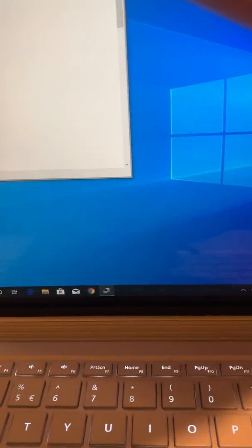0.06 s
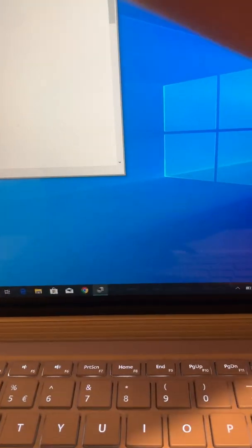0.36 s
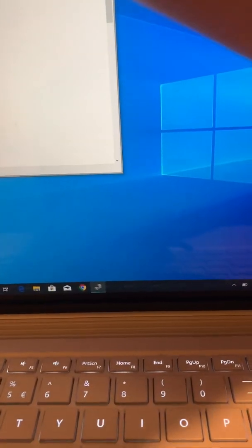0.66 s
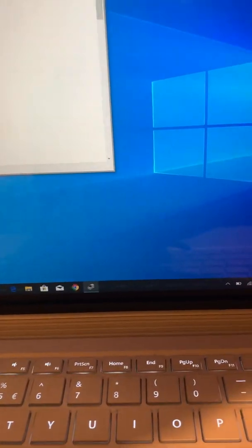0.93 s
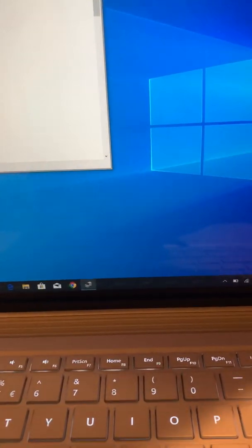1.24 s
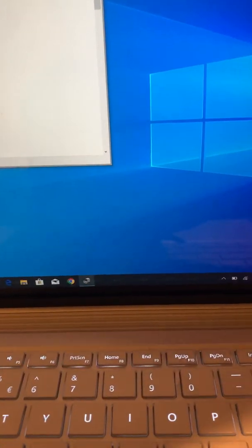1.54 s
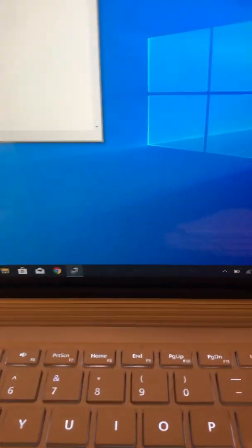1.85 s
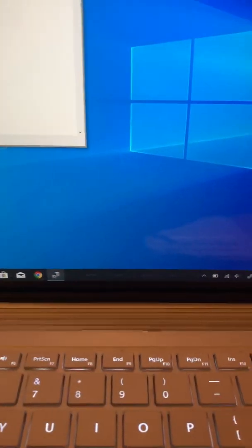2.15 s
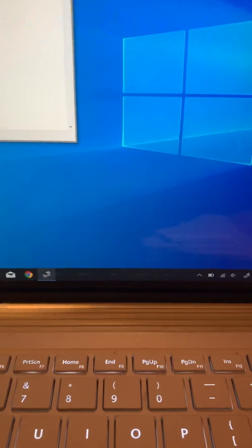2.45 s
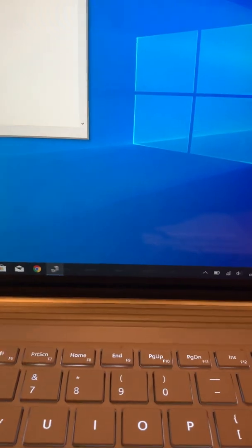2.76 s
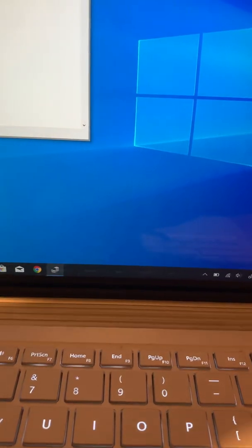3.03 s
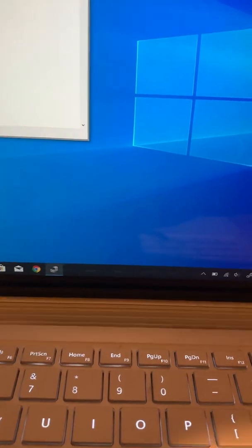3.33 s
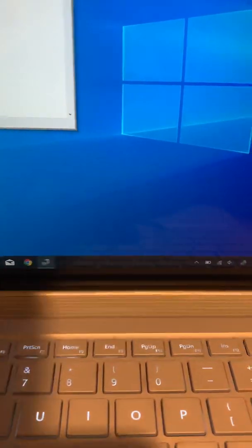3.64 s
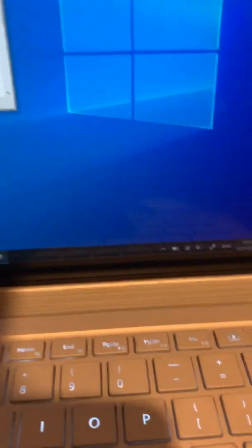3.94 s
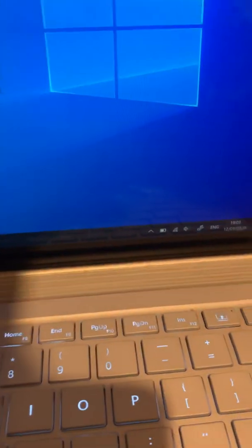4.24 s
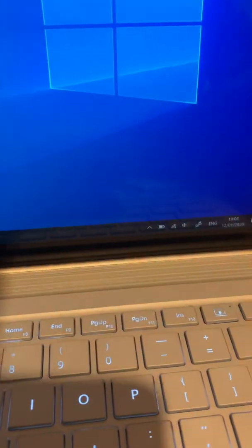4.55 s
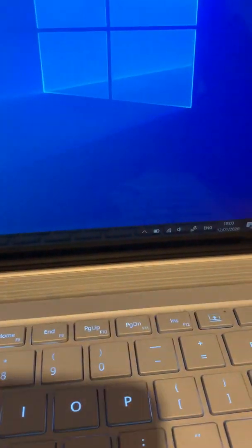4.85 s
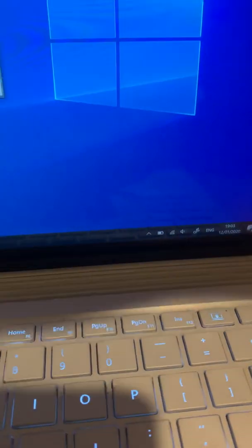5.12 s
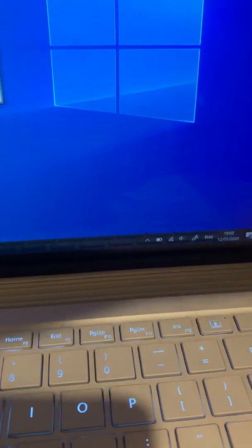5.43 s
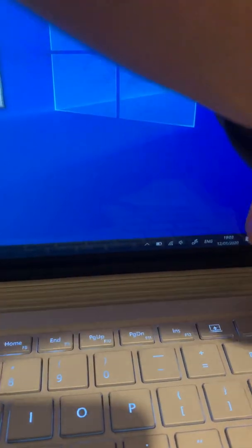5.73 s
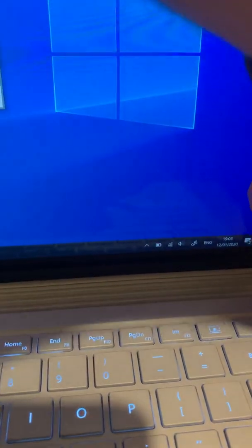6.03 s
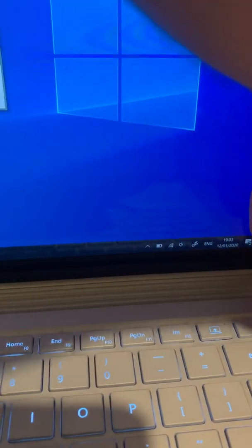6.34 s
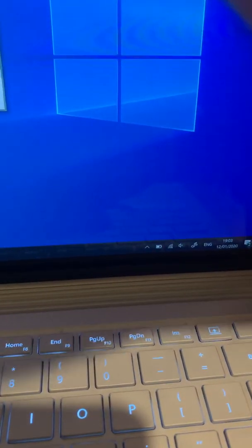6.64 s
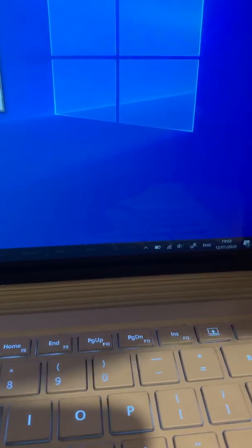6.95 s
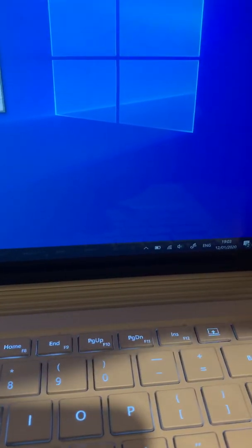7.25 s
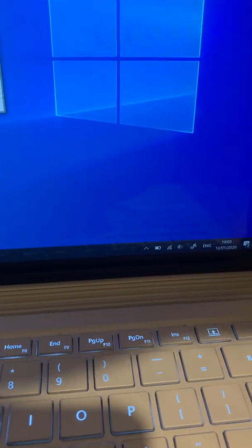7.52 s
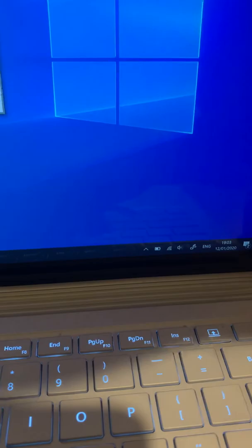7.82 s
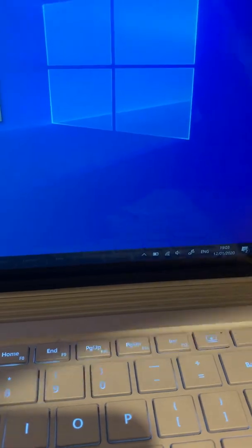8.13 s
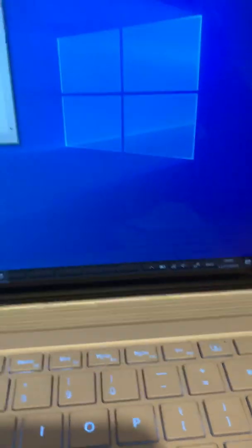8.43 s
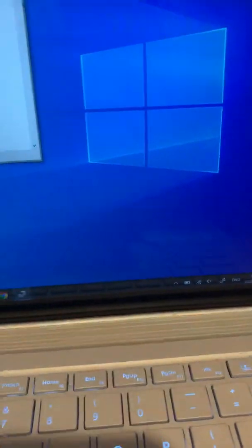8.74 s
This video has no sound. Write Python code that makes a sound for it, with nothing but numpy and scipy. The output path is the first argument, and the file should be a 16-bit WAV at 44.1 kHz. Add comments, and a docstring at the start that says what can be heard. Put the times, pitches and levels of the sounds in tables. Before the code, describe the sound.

A laptop is handled up close: scattered light taps, clicks and knocks, soft rubbing between them, and faint room rumble.

```python
"""A soft rub, then taps, knocks and ticks: a laptop handled close to a phone's microphones.
Fingers tap, nudge and scuff case and screen; panels ring, hinge and fittings tick, the lid clunks once.
Between taps, skin and sleeve rub along the case in short strokes of tiny slips.
Underneath: the low rumble of a small, quiet room, bumps of the hand-held phone and faint hiss."""
import sys
import numpy as np
from scipy import signal
from scipy.fft import rfft, irfft, next_fast_len
from scipy.io import wavfile
from scipy.ndimage import map_coordinates

SR = 44100
rng = np.random.default_rng(int(sys.argv[2]) if len(sys.argv) > 2 else 0)


def wav_record(signal):
    """Record a signal, one row per channel, as 16-bit PCM in the file named by sys.argv[1]."""
    frames = np.transpose(np.atleast_2d(signal))
    bounded = np.clip(frames, -1, 1)
    # unit amplitude maps onto the largest positive 16-bit level
    quanta = np.round(bounded * 32767).astype(np.int16)
    wavfile.write(sys.argv[1], SR, quanta)


N = 387198

# Finger contacts. Each row: start in seconds, relative thud, knock, clack and tick levels in dB,
# scuff T60 in seconds.
CONTACTS = [(0.314, -56.5, -60, -55.5, -60, 0.043), (0.3612, -48.5, -34.5, -39.5, -52, 0.016),
            (0.399, -52, -52.5, -54, -45.5, 0.0062), (0.6249, -90, -87, -61, -50, 0.0088),
            (0.6441, -60, -58.5, -51.5, -48, 0.056), (0.7501, -58, -57, -60.5, -53.5, 0.005),
            (0.8011, -63, -47, -48, -57.5, 0.051), (0.829, -57, -43, -43, -47, 0.068),
            (0.939, -48.5, -31, -34, -47, 0.0069), (0.953, -48, -52, -61, -43, 0.022),
            (1.007, -80, -56.5, -52.5, -47, 0.0067), (1.1011, -88, -52, -53.5, -57, 0.02),
            (1.315, -49.5, -57.5, -73, -81, 0.072), (1.3757, -49.5, -51.5, -62.5, -62, 0.029),
            (1.529, -50, -38.5, -55, -57.5, 0.023), (1.8044, -78, -49.5, -48, -46, 0.008),
            (1.825, -45.5, -37, -41.5, -45.5, 0.06), (1.8475, -34.5, -23.5, -29.5, -37.5, 0.022),
            (1.918, -44.5, -31.5, -31, -42.5, 0.017), (1.932, -47, -30.5, -31, -40, 0.022),
            (2.004, -75, -75.5, -40.5, -56, 0.064), (2.0808, -47, -40, -46, -47.5, 0.01),
            (2.2, -51, -50.5, -55.5, -62, 0.011), (2.552, -64, -44, -60, -54.5, 0.04),
            (3.192, -42.5, -46, -60, -72.5, 0.087), (3.2146, -47, -44.5, -53, -80.5, 0.012),
            (3.2958, -39.5, -32.5, -33, -38, 0.0088), (3.326, -45, -35, -47.5, -50.5, 0.026),
            (3.3336, -43, -36.5, -40.5, -54, 0.0054), (3.65, -57, -60.5, -75.5, -94, 0.28),
            (4.237, -61.5, -63.5, -57, -56, 0.2), (4.361, -46.5, -47, -38, -48.5, 0.17),
            (4.446, -47.5, -52, -47.5, -64, 0.04), (5.347, -49.5, -62.5, -58.5, -62, 0.035),
            (5.494, -55, -62.5, -76, -77.5, 0.1), (5.7097, -48.5, -43.5, -63.5, -64.5, 0.0037),
            (5.798, -47, -37, -38.5, -46, 0.018), (5.9627, -45.5, -34, -40.5, -42, 0.014),
            (5.9836, -41.5, -39, -57, -43.5, 0.042), (6.172, -52, -51.5, -61, -64.5, 0.037),
            (6.3405, -50.5, -42.5, -47, -57, 0.064), (6.437, -67, -54, -79, -66, 0.03),
            (6.5616, -71, -49.5, -48, -47.5, 0.0063), (6.7652, -50.5, -50.5, -51, -69, 0.0092),
            (6.8569, -51, -53.5, -68, -85, 0.033), (7.0349, -53.5, -56, -58, -66, 0.018),
            (7.0932, -43.5, -28.5, -36.5, -52.5, 0.016), (7.396, -62, -62.5, -86.5, -97, 0.064),
            (7.6792, -48, -35.5, -41, -49.5, 0.0093), (7.6852, -42.5, -35, -42, -64.5, 0.01),
            (7.698, -40, -37.5, -41, -49, 0.021), (7.9295, -39, -34.5, -36, -46, 0.017),
            (8.0152, -55.5, -53, -50, -48, 0.006), (8.298, -50.5, -50.5, -53, -59.5, 0.008),
            (8.3244, -53.5, -46.5, -45.5, -48.5, 0.0172), (8.41, -75, -56, -53, -62.5, 0.07),
            (8.473, -87, -79, -64, -67, 0.0058), (8.494, -87, -87.5, -69.5, -63.5, 0.008)]
# Case resonances. Each row: centre in Hz, width in Hz, relative level in dB.
CASE_MODES = [(278, 33, -7.5), (374, 72, 1.5), (565, 16, -1), (950, 98, -6), (1162, 120, 2.5),
              (1376, 57, 1.5), (1740, 130, -6), (2596, 280, -4), (3280, 400, -3), (3880, 190, -7.5),
              (6150, 1600, -3.5), (7800, 240, -8)]
# Broad response of the case to a contact. Each row: frequency in Hz, relative level in dB.
CONTACT_SPECTRUM = [(150, 3), (350, -5.5), (700, 1.5), (1250, 5), (2300, -4), (3800, -2.5), (5200, -8.5),
                    (8500, -16), (11000, -12.5), (15500, -18)]
# Edges of the thud, knock, clack, tick and sheen bands in Hz.
TAP_BAND_EDGES_HZ = [60, 600, 2200, 5000, 11000, 16000]
# Panel creaks. Each row: peak time in seconds, pitch in Hz, relative level in dB, half width in seconds.
PANEL_CREAKS = [(0.3676, 1432, -33.5, 0.0084), (0.9449, 1335, -17, 0.0019), (1.837, 1431, -30, 0.0035),
                (2.011, 3603, -40, 0.0069), (3.2962, 3370, -19.5, 0.0013), (3.296, 6430, -17.5, 0.00083),
                (5.363, 241, -44, 0.0073), (5.7998, 2520, -32, 0.0025), (5.8, 1185, -30.5, .004),
                (7.0948, 1390, -23, 0.0021), (7.0945, 1880, -30, .002), (7.7016, 1184, -17, 0.0031)]
# Heavy contacts. Each row: start in seconds, pitch in Hz, relative level in dB.
PANEL_THUMPS = [(1.848, 367, -29), (3.682, 335, -37.5), (7.932, 172, -41.5)]
# Lid resonances. Each row: frequency in Hz, relative level in dB.
LID_MODES = [(253, -41), (335, -42.5), (565, -39), (830, -36.5), (1090, -37.5), (1750, -45), (3170, -34.5),
             (3390, -40), (3810, -43), (4300, -40.5), (5780, -39), (9300, -46.5)]
# Skin and sleeve strokes. Each row: start and length in seconds, relative rub and hiss levels in dB.
RUB_STROKES = [(0.0, 0.22, -67, -85), (0.16, 0.24, -62, -75), (0.61, 0.087, -62.5, -72.5),
               (0.77, 0.23, -57.5, -68.5), (1.115, 0.022, -63.5, -61), (1.17, 0.081, -68, -80),
               (1.32, 0.1, -60.5, -70), (1.49, 0.056, -57.5, -70.5), (1.82, 0.3, -66, -71),
               (2.197, 0.03, -54.5, -65), (2.27, 0.38, -69, -76.5), (2.45, 0.19, -56.5, -67),
               (2.532, 0.05, -53, -52.5), (3.2, 0.18, -61.5, -73), (3.65, 0.084, -61.5, -92.5),
               (3.767, 0.034, -63, -98.5), (4.205, 0.16, -63.5, -70), (4.355, 0.047, -59, -53.5),
               (4.41, 0.087, -56.5, -67), (5.065, 0.18, -68, -73), (5.098, 0.08, -60, -56),
               (5.3, 0.083, -67.5, -78.5), (5.97, 0.064, -58, -78.5), (6.1, 0.04, -63, -77),
               (6.255, 0.22, -68.5, -82), (6.325, 0.033, -53.5, -62.5), (6.535, 0.015, -56, -62),
               (6.615, 0.06, -53.5, -63.5), (6.72, 0.032, -50.5, -60.5), (6.8, 0.023, -55, -66.5),
               (7.03, 0.054, -58, -62.5), (7.44, 0.047, -63, -90), (7.575, 0.035, -62, -86),
               (7.85, 0.16, -68.5, -79), (8.03, 0.026, -57, -79), (8.235, 0.084, -60, -68),
               (8.308, 0.011, -55, -59), (8.645, 0.14, -75.5, -76.5)]
# Friction of skin and of cloth. Each row: frequency in Hz, relative density in dB.
SKIN_SPECTRUM = [(100, -5), (300, -3), (600, -1.5), (1170, 2.5), (1700, -2.5), (2300, -7), (3000, -19),
                 (3800, -13.5), (5000, -21), (6500, -48)]
CLOTH_SPECTRUM = [(2600, -14.5), (3750, 4), (4900, -7.5), (6300, 0), (8300, 2), (9600, -14.5),
                  (15000, -15.5), (16300, -24.5)]
# Fingertip drags. Each row: start and length in seconds, first and last pitch in Hz, relative level in dB.
FINGER_SCRAPES = [(0.141, 0.2, 950, 1080, -69), (2.444, 0.11, 3830, 3970, -61.5),
                  (2.471, 0.15, 1148, 1250, -59), (2.533, 0.04, 8100, 8700, -53),
                  (3.774, 0.035, 1392, 1620, -64), (5.104, 0.081, 1440, 1800, -51.5),
                  (5.108, 0.071, 7930, 8540, -58), ]
# Room decay. Each row: frequency in Hz, T60 in seconds.
ROOM_T60 = [(150, 0.41), (500, 0.2), (1400, 0.22), (3700, 0.2), (10000, 0.15)]
# Grip shifts on the phone. Each row: start and length in seconds, relative rumble level in dB.
GRIP_SHIFTS = [(0.65, 0.32, -63), (1.3, 1.15, -61), (3.2, 0.7, -67.5), (5.7, 0.68, -66.5),
               (7.9, 0.089, -54), (8.63, 0.07, -56.5)]
# Room rumble and faint hiss. Each row: frequency in Hz, relative density in dB.
RUMBLE_SPECTRUM = [(20, -20.5), (52, 0.5), (100, -1.5), (170, -9), (320, -8.5), (450, -17), (650, -33),
                   (1500, -54.5)]
AIR_SPECTRUM = [(600, 0.5), (2500, 0.5), (8500, -2.5), (13000, -4.5), (16000, -12.5)]
# Scattered sound at the two microphones. Each row: frequency in Hz, correlation from 0 to 1.
MIC_COHERENCE = [(60, 1), (300, 0.51), (1000, 0.47), (2500, .05), (4000, 0.24), (5500, 0.93), (15000, 1)]
# Microphone phase difference. Each row: frequency in Hz, lead of the left in radians.
MIC_LEAD = [(60, 0), (550, -.5), (850, .9), (1200, .1), (1650, .1), (2850, 2.3), (3600, 1), (5100, 3.14),
            (8300, 6.3), (12300, 9.4), (15500, 12.2)]
# Microphone level difference. Each row: frequency in Hz, left minus right in dB.
MIC_BALANCE = [(40, 1), (200, -4.5), (1600, -2.5), (3600, -2), (5000, 0)]

TAP_BANDS = [signal.butter(3, edges_hz, "bandpass", fs=SR, output="sos")
             for edges_hz in zip(TAP_BAND_EDGES_HZ, TAP_BAND_EDGES_HZ[1:])]
LEAD_IN_S = 0.02  # time ahead of a contact's peak


def taps(gain_db, tap_room_db, tone_room_db, lid_at_s):
    """Contacts, creaks, thumps and the lid's clunk, each with its own room echo."""
    events = [(s - LEAD_IN_S, tap_room_db, *tap(levels_db, t60_s)) for s, *levels_db, t60_s in CONTACTS]
    tones = [(s - LEAD_IN_S, creak(hz, db, half_width_s)) for s, hz, db, half_width_s in PANEL_CREAKS]
    tones += [(s, thump(hz, db)) for s, hz, db in PANEL_THUMPS]
    tones.append((lid_at_s, lid_clunk()))
    events += [(s, tone_room_db, tone, tone) for s, tone in tones]
    track = np.zeros((2, N))
    for start_s, echo_db, direct, radiated in events:
        tail = room_tail(desk_db=11, desk_t60_s=0.02, build_s=0.0022)
        add(track, start_s, direct)
        add(track, start_s, amp(echo_db) * signal.fftconvolve(radiated[None], tail, axes=1))
    return amp(gain_db) * track


def tap(levels_db, scuff_t60_s, push=2.8, chatter=0.41, landing_db=-20, landing_s=0.05, swell_s=0.0026):
    """A finger brushes in, pushes and slips. Returns the near spot's ring and the whole case's clack."""
    onset, attack = round(LEAD_IN_S * SR), round(0.012 * SR)
    t = (np.arange(SR // 5) - onset) / SR
    slips = unit(rng.standard_normal(len(t)) * np.exp(chatter * rng.standard_normal(len(t))))
    landing = amp(landing_db - 60 * np.abs(t) / landing_s) + amp(-60 * np.abs(t) / swell_s)
    force = slips * np.where(t < 0, landing, amp(-60 * np.abs(t) / scuff_t60_s))
    force[onset] += push
    spot = filtered(force, lambda hz: case_response(hz, spread_db=5.5, detune=0.06, broad_db=-6))
    whole = filtered(1.0 * (t == 0), lambda hz: case_response(hz, spread_db=0, detune=0, broad_db=3))
    ring = np.array([spot, whole])
    # Pad, nail or fitting weights the bands differently; hard contacts add sheen.
    _, knock_db, _, tick_db = levels_db
    sheen_db = tick_db - 5 + 0.3 * np.clip(tick_db - knock_db, -20, 10)
    sound = np.zeros_like(ring)
    for bandpass, db in zip(TAP_BANDS, [*levels_db, sheen_db]):
        band = signal.sosfilt(bandpass, ring)
        attack_rms = np.sqrt(np.mean(band[:, onset:onset + attack] ** 2, axis=1, keepdims=True))
        sound += amp(db) * band / attack_rms
    return sound


def case_response(hz, spread_db, detune, broad_db):
    """Each spot of the case favours other modes, over a bed of well-damped ones."""
    response = amp(broad_db) * minimum_phase(amp(along(CONTACT_SPECTRUM, hz)))
    for centre_hz, width_hz, db in CASE_MODES:
        strength, shift = rng.standard_normal(2)
        mode_hz = centre_hz * np.exp(detune * shift)
        damping = 1j * hz * width_hz
        response += amp(db + spread_db * strength) * damping / (mode_hz ** 2 - hz ** 2 + damping)
    return response


def creak(hz, db, half_width_s, octave_db=-17):
    """A push or slip sounds one panel resonance for a few cycles, with a weak octave."""
    t = np.arange(round(2 * LEAD_IN_S * SR)) / SR - LEAD_IN_S
    phase = 2 * np.pi * hz * t
    swell = np.exp(-(t / half_width_s) ** 2)
    return amp(db) * swell * (np.sin(phase) + amp(octave_db) * np.sin(2 * phase))


def thump(hz, db, attack_s=0.0056, t60_s=0.16, jitter_rad=0.82):
    """A heavy contact booms a low panel mode, which dies unevenly under the hand."""
    t = np.arange(SR // 4) / SR
    phase = 2 * np.pi * hz * t + jitter_rad * wobble(hz / 2, len(t))
    return amp(db - 60 * t / t60_s) * (1 - np.exp(-t / attack_s)) * np.sin(phase)


def lid_clunk(attack_s=0.0011, t60_s=0.21, jitter_rad=0.95):
    """The lid rocks once and rings in many modes, unevenly as it rattles in the hinge."""
    t = np.arange(SR // 3) / SR
    ring = np.zeros(len(t))
    for hz, db in LID_MODES:
        phase = 2 * np.pi * (hz * t + rng.random()) + jitter_rad * wobble(171, len(t))
        ring += amp(db) * np.sin(phase)
    return amp(-60 * t / t60_s) * (1 - np.exp(-t / attack_s)) * ring


def rubbing(rub_gain_db, hiss_gain_db, snag_db, room_db):
    """Skin drags and snags on the panels while cloth hisses over them, under uneven hand pressure."""
    rub, hiss = gesture_gains(RUB_STROKES, attack_s=0.011, release_t60_s=0.17)
    pressure = unit(amp(1.9 * wobble(45)))
    skin = amp(rub_gain_db) * rub * slide_over_case(friction(SKIN_SPECTRUM, grain=1.1, clump_db=3.5))
    cloth = amp(hiss_gain_db) * hiss * friction(CLOTH_SPECTRUM, grain=0.68, clump_db=3)
    sliding = pressure * (skin + cloth) + scrapes()
    echo = moving_echo(sliding)
    ticks = amp(snag_db) * np.sqrt(rub * hiss) * snags()
    return sliding + ticks + amp(room_db) * echo


def friction(spectrum, grain, clump_db):
    """Dense tiny slips of uneven size, clumped as the surface catches."""
    slips = rng.standard_normal(N) * np.exp(grain * rng.uniform(-2.2, 2, N))
    clumps = amp(clump_db * np.minimum(wobble(320), 2))
    return coloured(slips * clumps, spectrum)


def slide_over_case(x, rate_hz=8, spot_count=4):
    """The excited resonances change as the hand slides from spot to spot."""
    def resonances(hz):
        return case_response(hz, spread_db=6, detune=0.05, broad_db=0) / amp(along(CONTACT_SPECTRUM, hz))
    spots = np.array([unit(filtered(x, resonances)) for _ in range(spot_count)])
    nearness = np.exp([wobble(rate_hz) for _ in range(spot_count)])
    return unit(np.sum(spots * nearness, axis=0) / np.linalg.norm(nearness, axis=0))


def scrapes(width_hz=520, flutter_db=4):
    """Uneven stick-slip: fuzzy, broken bands that glide with the fingertip."""
    track, t = np.zeros(N), np.arange(SR // 2) / SR
    for start_s, length_s, first_hz, last_hz, db in FINGER_SCRAPES:
        hz = np.interp(t, [0, length_s], [first_hz, last_hz])
        slips = wobble(width_hz, len(t)) + 1j * wobble(width_hz, len(t))
        band = np.real(slips * np.exp(2j * np.pi * np.cumsum(hz) / SR))
        flutter = amp(flutter_db * wobble(100, len(t)))
        envelope = gesture(t, length_s, attack_s=0.021, release_t60_s=0.13)
        add(track, start_s, amp(db) * unit(band * flutter) * envelope)
    return track


def snags(rate_hz=140, scatter_db=5):
    """The sliding finger catches and lets go in tiny crisp ticks."""
    impulses = (rng.random(N) < rate_hz / SR) * rng.choice([-1, 1], N)
    sizes = amp(scatter_db * rng.uniform(-1, 1, N))
    return unit(filtered(impulses * sizes, lambda hz: minimum_phase(amp(along(CONTACT_SPECTRUM, hz)))))


def moving_echo(x, hop_s=0.25):
    """A moving hand meets new reflections from moment to moment."""
    hop = round(hop_s * SR)
    padded, echo = np.pad(x, (hop, 2 * hop)), np.zeros((2, N + hop))
    fade = np.sqrt(np.hanning(2 * hop))
    for start in range(0, N + hop, hop):
        piece = padded[start:start + 2 * hop] * fade
        tail = room_tail(desk_db=15, desk_t60_s=0.027, build_s=0.00026)
        add(echo, start / SR, signal.fftconvolve(piece[None], tail, axes=1))
    return echo[:, hop:]


def room_tail(desk_db, desk_t60_s, build_s):
    """Stereo impulse response: quick reflections between screen and desk, then the walls."""
    hz, frame_s, noise = signal.stft(rng.standard_normal((2, SR // 3)), SR, nperseg=256)
    decay = amp(-60 * frame_s / along(ROOM_T60, hz)[:, None])
    _, walls = signal.istft(noise * decay, SR, nperseg=256)
    t = np.arange(walls.shape[1]) / SR
    desk_boost = 1 + amp(desk_db - 60 * t / desk_t60_s)
    tail = diffuse(walls * desk_boost * (1 - np.exp(-t / build_s)))
    return tail / np.sqrt(np.sum(tail ** 2) / 2)


def background(rumble_db, grip_gain_db, air_db):
    """Low room rumble that swells and bumps as the grip on the phone shifts, plus faint even hiss."""
    grip, = gesture_gains(GRIP_SHIFTS, attack_s=0.032, release_t60_s=0.24)
    bumps = amp(2.5 * wobble(22))
    rumble = coloured(diffuse(rng.standard_normal((2, N))), RUMBLE_SPECTRUM)
    air = coloured(diffuse(rng.standard_normal((2, N))), AIR_SPECTRUM)
    return np.hypot(amp(rumble_db), amp(grip_gain_db) * grip) * bumps * rumble + amp(air_db) * air


def diffuse(pair):
    """Two unrelated signals become scattered sound, partly alike at the two microphones."""
    def mid_side_gains(hz):
        angle = np.arccos(np.clip(along(MIC_COHERENCE, hz), -1, 1)) / 2
        return np.array([np.cos(angle), np.sin(angle)])
    mid, side = filtered(pair, mid_side_gains)
    return np.array([mid + side, mid - side])


def gesture(t, length_s, attack_s, release_t60_s):
    """Gain of one hand movement: build, hold, release."""
    return np.clip(t / attack_s, 0, 1) * amp(-60 * np.clip((t - length_s) / release_t60_s, 0, 2))


def gesture_gains(rows, attack_s, release_t60_s):
    """One gain curve per level column; overlapping movements add in power."""
    t = np.arange(N) / SR
    envelopes = np.array([gesture(t - s, length_s, attack_s, release_t60_s) for s, length_s, *_ in rows])
    gains = amp(np.array(rows)[:, 2:].T)
    return np.sqrt(gains ** 2 @ envelopes ** 2)


def amp(db):
    """Decibels to gain."""
    return 10 ** (np.asarray(db) / 20)


def unit(x):
    """Scale to rms 1."""
    return x / np.sqrt(np.mean(x ** 2) + 1e-20)


def along(points, hz):
    """Read (Hz, value) points on a log axis."""
    point_hz, values = np.transpose(points)
    return np.interp(np.log(hz + 1), np.log(point_hz + 1), values)


def wobble(rate_hz, size=N):
    """Smooth random curve, rate_hz knots a second."""
    knots = rng.standard_normal(int(size * rate_hz / SR) + 4)
    return map_coordinates(knots, [np.arange(size) * rate_hz / SR])


def filtered(x, response):
    """Apply a complex frequency response."""
    size = x.shape[-1]
    fft_size = next_fast_len(size + 4096, real=True)
    hz = np.fft.rfftfreq(fft_size, 1 / SR)
    return irfft(rfft(x, fft_size) * response(hz), fft_size)[..., :size]


def coloured(x, spectrum):
    """Give noise a spectrum, at rms 1."""
    return unit(filtered(x, lambda hz: amp(along(spectrum, hz))))


def minimum_phase(gain):
    """Causal response with this gain."""
    cepstrum = irfft(np.log(gain))
    half = len(cepstrum) // 2
    cepstrum[1:half] *= 2
    cepstrum[half + 1:] = 0
    return np.exp(rfft(cepstrum))


def add(track, start_s, sound):
    """Mix a sound into a track."""
    start = max(round(start_s * SR), 0)
    part = track[..., start:start + sound.shape[-1]]
    part += sound[..., :part.shape[-1]]


def scene():
    """Taps and rubbing over the room's background."""
    return (taps(gain_db=-2, tap_room_db=-6, tone_room_db=-19, lid_at_s=4.3605)
            + rubbing(rub_gain_db=-2, hiss_gain_db=-1, snag_db=-4.5, room_db=0.5)
            + background(rumble_db=-68.5, grip_gain_db=1, air_db=-79.5))


def record(dry, top_hz=16500):
    """Two microphones: the left leads in phase, increasingly toward the highs; lows are louder in the right;
    cut above top_hz."""
    def microphones(hz):
        split = np.array([[0.5], [-0.5]])
        gain = amp(split * along(MIC_BALANCE, hz))
        phase = split * along(MIC_LEAD, hz)
        return gain * np.exp(1j * phase) * (hz < top_hz)
    return filtered(dry, microphones)


dry = scene()
out = record(dry)
wav_record(out)
```